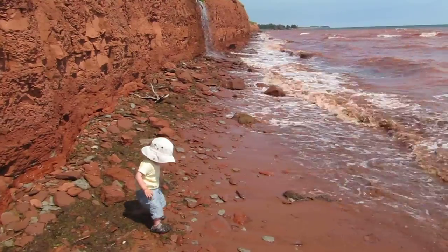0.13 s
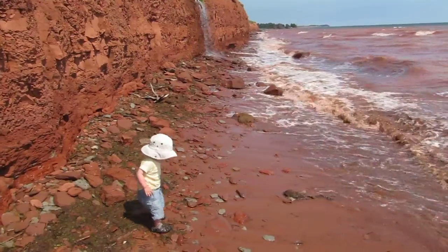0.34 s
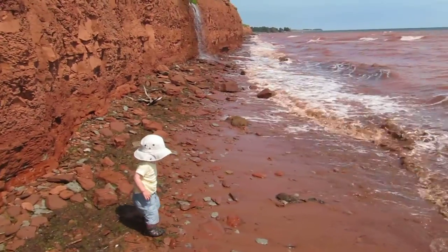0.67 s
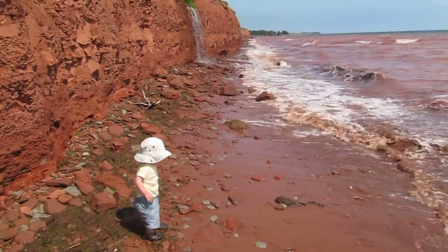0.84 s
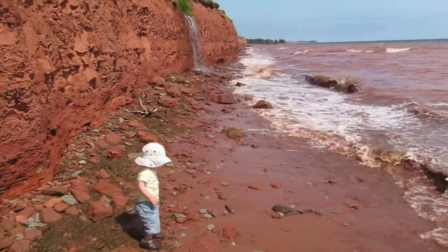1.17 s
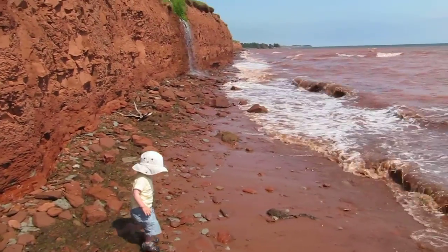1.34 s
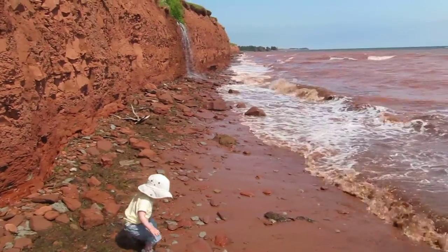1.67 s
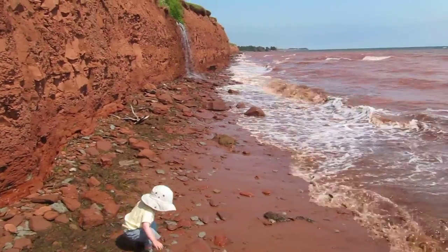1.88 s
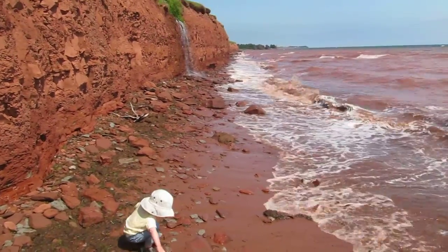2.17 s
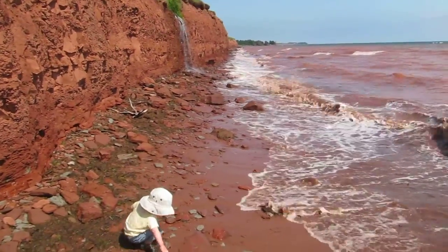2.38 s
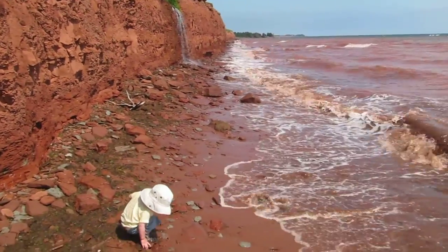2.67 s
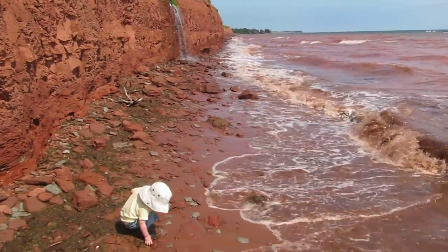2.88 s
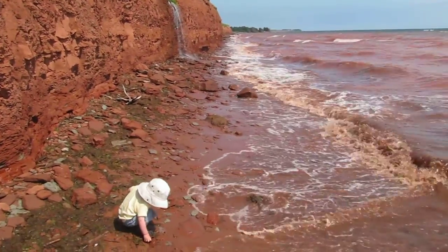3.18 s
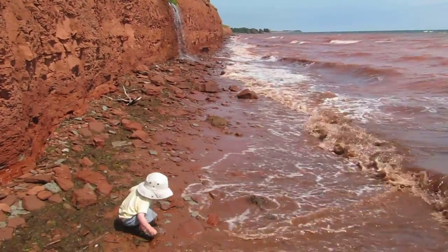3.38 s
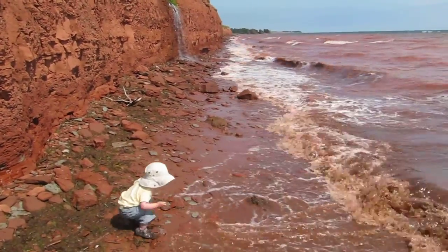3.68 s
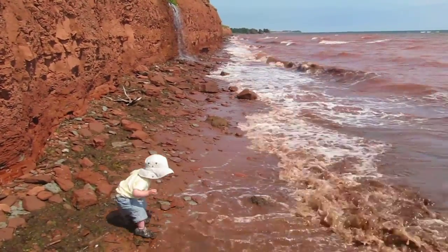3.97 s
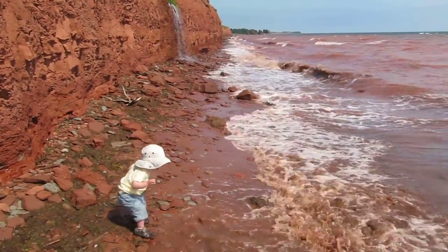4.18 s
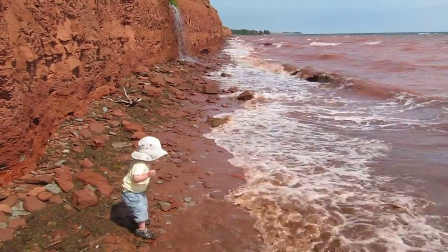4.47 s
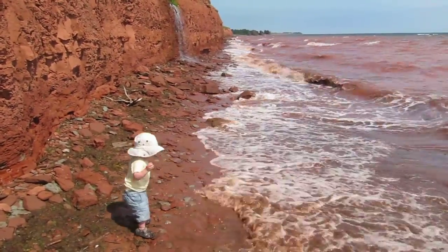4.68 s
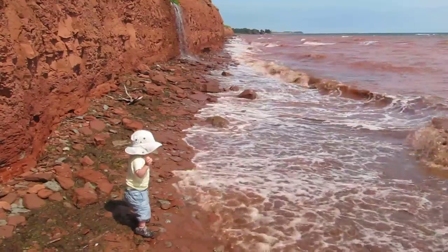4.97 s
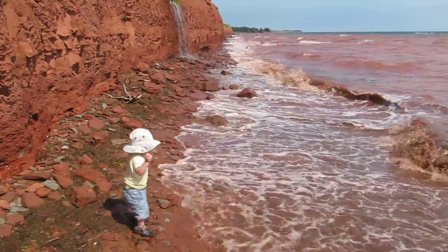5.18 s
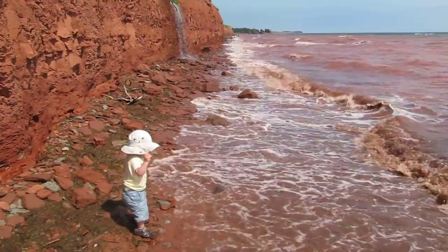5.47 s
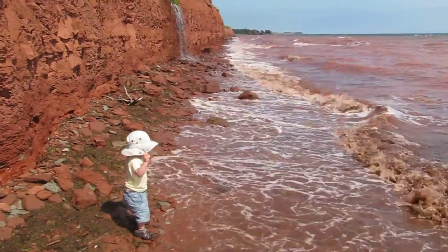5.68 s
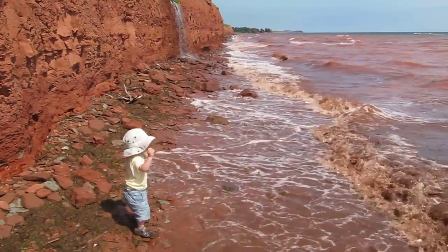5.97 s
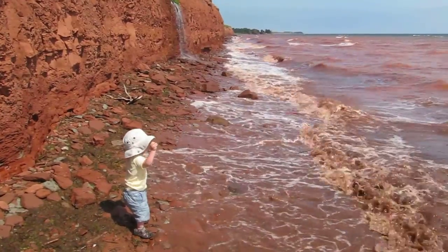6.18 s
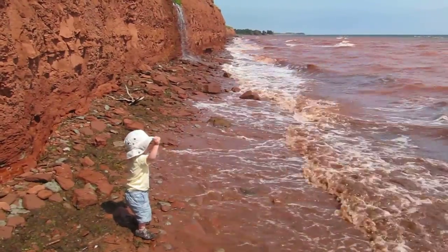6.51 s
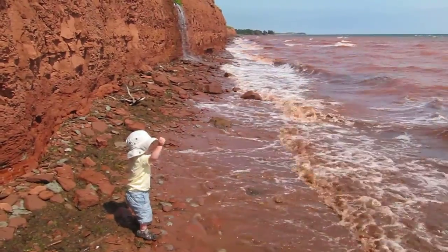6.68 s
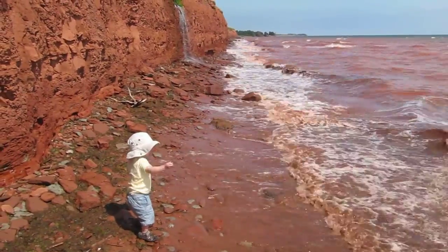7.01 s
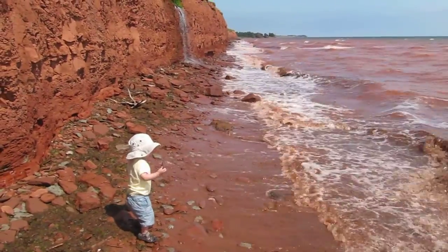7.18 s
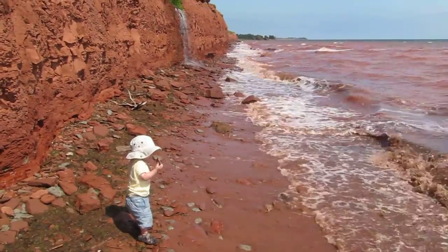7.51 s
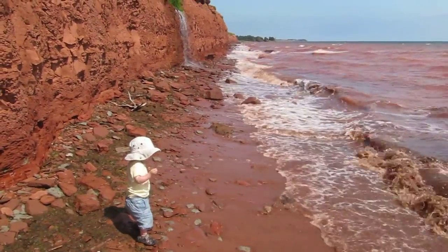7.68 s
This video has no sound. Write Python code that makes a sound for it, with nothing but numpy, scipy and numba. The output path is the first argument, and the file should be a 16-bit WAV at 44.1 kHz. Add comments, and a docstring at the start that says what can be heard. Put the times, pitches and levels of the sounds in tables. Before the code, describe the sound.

Waves break and wash up a stony beach close by, with hissing foam, a low gurgling rumble and hollow slaps of water between stones. Brief patters of spray land nearby. Wind rumbles on the microphone in short swells at first, then in two runs of gusts, mostly on the right. Near the end the hardest gust pops the microphone and everything dips briefly before the surf returns.

```python
"""Waves wash up a stony beach to the right of a small camera with two microphone ports.
From the start foam hisses, breakers rumble and gurgle, and water slaps hollow between stones.
Wind rumbles on each port alone and swells near 1.3 and 2 s, about when the first spray lands.
From 4.4 s a run of gusts strikes mainly the right port, and another from 6.2 s; at 6.7 s the
hardest one snaps its membrane, and the gain control ducks everything, then recovers."""
import sys
import numpy as np
from scipy import signal
from scipy.fft import rfft, irfft, next_fast_len
from scipy.io import wavfile
from scipy.ndimage import uniform_filter1d
from numba import njit

SR = 44100
rng = np.random.default_rng(int(sys.argv[2]) if len(sys.argv) > 2 else 0)


def transcribe(u):
    """Save the signal u as a 16-bit wav file named by the first command-line argument.

    u: samples, shape (n,) or (channels, n), limited to [-1, 1]; the rate is SR.
    q: integer samples, one column per channel.
    """
    v = np.clip(np.atleast_2d(u).T, -1, 1)
    q = np.round(v * 32767).astype(np.int16)
    wavfile.write(sys.argv[1], SR, q)


N = 346185


def undb(db):
    return 10 ** (np.asarray(db) / 20)


def at_rms(x, db):
    return x * undb(db) / np.sqrt(np.mean(x ** 2))


def time_curves(table):
    time_s, *columns = np.transpose(table)
    return [np.interp(np.arange(N) / SR, time_s, column) for column in columns]


def freq_curve(table, hz):
    freq_hz, values = np.transpose(table)
    return np.interp(np.log(hz + 1), np.log(freq_hz), values)


def butter(x, edges_hz, kind="bandpass", order=2):
    return signal.sosfilt(signal.butter(order, edges_hz, kind, fs=SR, output="sos"), x)


def walk(rate_hz):
    """Random steps, smoothed twice; spread near 1."""
    hold = int(SR / rate_hz)
    steps = np.repeat(rng.standard_normal(N // hold + 1), hold)
    return 0.94 * uniform_filter1d(uniform_filter1d(steps, hold), hold)[:N]


def flicker(rate_hz, drift_s=0.19):
    """A walk minus its slow drift."""
    wander = walk(rate_hz)
    return wander - uniform_filter1d(wander, int(drift_s * SR))


# Stronger wind: start_s, port (-1 left, 1 right), hold_s, level_db
WIND_SPELLS = [(1.3, 1, 0.042, -15), (1.48, -1, 0.033, -25), (1.86, 1, 0.037, -24.5), (2.02, -1, 0.11, -16),
               (2.1, 1, 0.036, -22), (3.1, 1, 0.29, -28), (4.38, 1, 0.04, -27), (4.37, -1, .55, -23),
               (4.43, 1, 0.15, -16.5), (4.66, 1, 0.27, -16.5), (5.08, -1, 0.028, -24),
               (5.09, 1, 0.054, -19), (5.43, 1, 0.04, -18.5), (6.28, -1, 0.11, -22),
               (6.16, 1, 0.032, -21.5), (6.3, 1, 0.04, -10.5), (6.55, -1, .2, -21), (6.665, 1, 0.06, -12),
               (6.9, 1, 0.11, -17.5), (6.98, -1, 0.16, -22.5), (7.07, 1, 0.08, -12.5),
               (7.49, 1, 0.094, -16), (7.5, -1, 0.093, -21)]
def wind_db(port, breeze_db=-37, swing_db=4, rise_db_per_s=281, fall_db_per_s=180):
    """A wandering breeze; each spell is full at start_s, holds and dies away."""
    t = np.arange(N) / SR
    db = breeze_db + swing_db * walk(5.13)
    for start_s, side, hold_s, level_db in WIND_SPELLS:
        if side == port:
            before_db = rise_db_per_s * np.maximum(start_s - t, 0)
            after_db = fall_db_per_s * np.maximum(t - start_s - hold_s, 0)
            db = np.maximum(db, level_db - before_db - after_db)
    return db


def wind():
    """Eddies rumble and flutter on each port alone; stronger wind sheds smaller, higher ones too."""
    out = []
    for port in (-1, 1):
        db = wind_db(port) + 2.75 * walk(22)
        large = at_rms(butter(rng.standard_normal(N), [39.3, 137]), 0)
        small = at_rms(butter(rng.standard_normal(N), [114, 345]), 0)
        out.append(undb(db) * (large + small * undb(0.57 * (db + 11) - 3.5)))
    return np.array(out)


# Gusts: centre_s, port (-1 left, 1 right), length_s, level_db, pitch_hz
WIND_GUSTS = [(0.296, 1, 0.017, -12.5, 117), (1.338, 1, 0.04, -16, 160), (1.377, 1, 0.025, -15.5, 70),
              (2.059, -1, 0.035, -9.5, 123), (2.095, 1, 0.025, -13.5, 141), (4.384, 1, 0.018, -8, 110),
              (4.415, 1, 0.03, -13, 220), (4.478, 1, 0.035, -11, 151), (4.505, 1, 0.043, -8.5, 127),
              (4.54, 1, 0.026, -9, 130), (4.572, 1, 0.042, -7.5, 119), (4.676, 1, 0.016, -14, 146),
              (4.701, 1, 0.064, -10.5, 140), (4.786, 1, 0.062, -9, 158), (4.839, 1, 0.025, -13, 89.5),
              (4.88, 1, 0.035, -16, 128), (4.931, 1, 0.052, -16.5, 110), (5.086, -1, 0.023, -19, 94.3),
              (5.095, 1, 0.019, -16, 188), (6.156, 1, 0.015, -19, 170), (6.186, 1, 0.016, -8, 200),
              (6.187, 1, 0.013, -14.5, 430), (6.193, -1, 0.027, -18, 114), (6.253, 1, 0.013, -18, 170),
              (6.291, -1, 0.017, -7.5, 95), (6.297, 1, 0.02, -13.5, 490), (6.304, 1, 0.023, -9, 161),
              (6.322, -1, 0.019, -11, 92), (6.384, 1, 0.013, -13, 209), (6.619, -1, 0.012, -18, 110),
              (6.655, -1, 0.0091, -13, 130), (6.664, 1, 0.016, -5, 190), (6.679, 1, 0.011, 0.5, 292),
              (6.688, 1, 0.0055, -7, 200), (6.703, 1, 0.0082, -2, 192), (6.914, 1, 0.023, -15, 117),
              (7.091, 1, 0.014, -10, 161), (7.147, 1, 0.056, -14.5, 200), (7.167, -1, 0.029, -19, 268),
              (7.308, 1, 0.015, -16, 150), (7.495, 1, 0.01, -10, 170), (7.507, 1, 0.012, -9, 160),
              (7.524, 1, 0.014, -8, 211), (7.545, 1, 0.037, -8, 238)]
def gusts():
    """Each gust is a short lump of low turbulence on one port."""
    half = SR // 5
    t = np.arange(-half, half) / SR
    out = np.zeros((2, N + 2 * half))
    for centre_s, port, length_s, level_db, pitch_hz in WIND_GUSTS:
        envelope = np.exp(-.5 * (t / (0.47 * length_s)) ** 2)
        turbulence = butter(rng.standard_normal(2 * half), [0.658 * pitch_hz, 1.35 * pitch_hz])
        power = uniform_filter1d(turbulence ** 2, int(SR / pitch_hz))
        turbulence /= np.sqrt(power + 1e-9)  # pressure holds through the gust
        lump = envelope * butter(turbulence, 2.8 * pitch_hz, "lowpass")
        lump *= undb(level_db) * np.sqrt(np.sum(envelope ** 2) / np.sum(lump ** 2))
        at = int(centre_s * SR)
        out[int(port > 0), at:at + 2 * half] += lump
    return out[:, half:half + N]


# Membrane snaps: start_s, port (-1 left, 1 right), level_db, pitch_hz
MEMBRANE_SNAPS = [(4.373, 1, -9, 105), (4.473, 1, -2.5, 150), (4.494, 1, -10, 110), (4.668, 1, -7, 140),
                  (6.65, -1, -3, 121), (6.6945, 1, 13, 150), (6.732, 1, -6, 200), (7.081, 1, -5, 130),
                  (7.357, 1, -2.5, 170), (7.492, 1, -7, 170), (7.503, 1, -7, 150)]
def snaps(rise_s=0.00019, t60_s=0.043):
    """Wind snaps a port's membrane: a sudden pressure drop, then a few dying swings."""
    t, out = np.arange(N) / SR, np.zeros((2, N))
    for start_s, port, level_db, pitch_hz in MEMBRANE_SNAPS:
        age_s = np.maximum(t - start_s, 0)
        envelope = undb(level_db - 60 * age_s / t60_s) * (1 - np.exp(-age_s / rise_s))
        out[int(port > 0)] -= envelope * np.cos(2 * np.pi * pitch_hz * age_s)
    return out


# Landing spray: start_s, level_db, length_s
SPRAY_SPLASHES = [(1.756, -27, 0.018), (2.257, -24.5, 0.016), (3.93, -32, .012), (4.0, -27, 0.018),
                  (4.18, -31.5, .015), (4.284, -27, .012), (5.07, -31, .012), (5.16, -37, 0.018),
                  (6.63, -26.5, 0.0142)]
def splashes():
    """Thrown spray lands close by in short patters, louder on the right."""
    t, envelope = np.arange(N) / SR, np.zeros(N)
    for start_s, level_db, length_s in SPRAY_SPLASHES:
        envelope += undb(level_db) * np.exp(-.5 * ((t - start_s - length_s) / (0.61 * length_s)) ** 2)
    patter = at_rms(butter(rng.standard_normal((2, N)), [1500, 5300]), 0)
    return envelope * patter * undb([[-2.5], [1.5]])


# Hollow slaps: start_s, peak_db, pitch_hz, t60_s, glide_share_per_s
WATER_SLAPS = [(0.235, -16, 983, .1, 0.5), (0.25, -17, 760, .12, 0.5), (0.27, -16, 420, .1, 1),
               (0.61, -18, 688, 0.22, -3), (0.626, -12, 364, 0.096, 3.5), (0.629, -18, 1166, .3, -1.5),
               (0.659, -15.5, 452, 0.22, -6), (0.735, -15, 147, 0.22, -2), (0.752, -18, 860, 0.091, -2),
               (0.857, -19, 625, .12, 0), (1.515, -9, 199, 0.11, -3), (1.515, -10.5, 270, 0.091, -0.5),
               (1.754, -21, 3260, 0.04, 0), (1.849, -12.5, 320, 0.21, 1), (1.889, -12.5, 302, 0.16, -0.5),
               (1.948, -24, 2900, .06, 5), (2.595, -20, 735, 0.08, 2), (2.659, -18, 276, 0.1, 3),
               (2.775, -21, 322, 0.1, 0), (2.69, -14.5, 515, 0.097, 1), (2.8, -19, 645, 0.2, 0),
               (2.989, -15, 276, 0.12, 0), (3.02, -19, 472, .12, 1), (3.099, -22, 277, 0.16, 4.5),
               (3.15, -20, 664, 0.11, -3), (3.04, -25, 420, 0.091, 0), (3.125, -16, 313, 0.092, 3),
               (3.29, -15, 300, 0.09, 5), (3.352, -16, 185, 0.18, -3), (4.172, -22, 2650, .06, 2),
               (5.068, -22, 191, 0.14, 2), (7.166, -11.5, 282, 0.1, 1)]
def slaps():
    """Water traps a pocket of air between stones, which rings briefly in both ports."""
    t, out = np.arange(N) / SR, np.zeros(N)
    for start_s, peak_db, pitch_hz, t60_s, glide_per_s in WATER_SLAPS:
        age_s = np.maximum(t - start_s, 0)
        envelope = (1 - np.exp(-age_s / 0.0012)) * undb(-60 * age_s / t60_s)
        tone = np.sin(2 * np.pi * pitch_hz * age_s * (1 + glide_per_s * age_s / 2))
        out += undb(peak_db) * envelope / envelope.max() * tone
    return out * undb([[-1.5], [0]])


@njit
def ring_bubbles(starts, steps_rad, cycles, gains, rise_share):
    """Each bubble is a dying sine whose pitch climbs as it nears the surface."""
    out = np.zeros(N)
    for start, step_rad, gain in zip(starts, steps_rad, gains):
        length = int(cycles * 2 * np.pi / step_rad)
        phase = 0.
        for i in range(min(length, N - start)):
            phase += step_rad * (1 + rise_share * i / length)
            out[start + i] += gain * np.exp(-5. * i / length) * np.sin(phase)
    return out


def bubbles(lo_hz, hi_hz, cycles, spread_db, count):
    """Bubbles at random moments, a few much louder than the rest; unit RMS."""
    when, pitch, strength = rng.random((count, 3)).T
    starts = (when * N).astype(np.int64)
    steps_rad = 2 * np.pi * lo_hz * (hi_hz / lo_hz) ** pitch / SR
    gains = undb(spread_db * np.minimum(-np.log(1 - strength), 4))
    return at_rms(ring_bubbles(starts, steps_rad, cycles, gains, rise_share=0.19), 0)


LEFT_LAG_S = 5.5e-5  # near water reaches the right port first

# Bursting foam bubbles: time_s, above_surf_db
FOAM_POPPING = [(0, -26), (.9, -20), (1.6, -18), (2.2, -16), (2.7, -25), (3.1, -16), (3.7, -16), (4.1, -19),
                (4.6, -19), (5.0, -15.5), (5.25, -13.5), (5.6, -20), (6.2, -18), (6.9, -16), (7.25, -12),
                (7.5, -17), (7.85, -22)]
def near_bubbles(body_db):
    """Large bubbles gurgle with the breakers; small ones pop in the foam."""
    gurgle = bubbles(194, 1360, cycles=10, spread_db=2.8, count=4000) * undb(body_db - 11)
    pops = bubbles(2970, 4240, cycles=7.7, spread_db=5, count=9000) * undb(time_curves(FOAM_POPPING)[0])
    right = gurgle + pops
    left = np.roll(right, round(LEFT_LAG_S * SR)) * undb(-2)
    return np.array([left, right])


# Surf spectrum: freq_hz, density_db
SURF_SPECTRUM = [(18, -27), (85, -9.5), (150, -5), (290, -2), (450, -5.5), (700, -3), (1700, -8),
                 (2600, -11.5), (3300, -11), (3900, -14.5), (4800, -18.5), (6400, -21.5), (7600, -34),
                 (9000, -32), (11200, -27), (15600, -39)]
# Port balance: freq_hz, left_minus_right_db
PORT_BALANCE = [(60, 5), (110, -2), (200, -2), (380, -1.5), (700, -2), (1290, -0.5), (2380, -7.5),
                (4400, -1.5), (8120, -1.5), (15000, 2.5)]
# Sound common to both ports: freq_hz, power_share
PORT_COHERENCE = [(60, 0.99), (200, 0.99), (700, 0.99), (1200, 0.93), (2000, 0.17), (3000, 0.99),
                  (4500, 0.24), (6000, 0.5), (7400, 0.04), (9000, 1), (10500, 0), (14000, 0.1)]
# Left port's phase beyond its lag: freq_hz, phase_rad
LEFT_PHASE = [(7500, 0), (9000, -1.5), (10200, -1.6), (12000, -1.6), (14000, -0.4)]
def surf_spectra(hz, n_fft):
    """Near breakers reach both ports as one noise; far water comes from all sides."""
    coherence = np.clip(freq_curve(PORT_COHERENCE, hz), 0, 1)
    common, left, right = rfft(rng.standard_normal((3, n_fft)))
    left_rad = freq_curve(LEFT_PHASE, hz) - 2 * np.pi * hz * LEFT_LAG_S
    near = np.sqrt(coherence) * common * np.exp(1j * left_rad * [[1], [0]])
    far = np.sqrt(1 - coherence) * np.array([left, right])
    colour_db = freq_curve(SURF_SPECTRUM, hz) + freq_curve(PORT_BALANCE, hz) * [[.5], [-.5]]
    spectra = (near + far) * undb(colour_db)
    return spectra / np.sqrt(2 * np.mean(abs(spectra) ** 2) / n_fft)


# Fizz of foam and pebbles, and finest spray: time_s, fizz_above_foam_db, mist_above_foam_db
FOAM_FIZZ = [(0, 4.5, 5.5), (.4, 3.5, 4.5), (.9, 3, 4.5), (1.3, 5, 5), (1.55, 3, 2.5), (1.85, 5, 4.5),
             (2.2, 4.5, 5.5), (2.5, 5.5, 5.5), (2.9, 4, 4), (3.3, 3, 4), (3.7, 4, 3.5), (4.3, 5, 6),
             (4.8, 3.5, 6), (5.1, 4.5, 5), (5.5, 3, 5), (5.9, 4, 5), (6.3, 5.5, 5), (6.65, 5.5, 8),
             (6.95, 5, 6.5), (7.1, 5, 6), (7.22, 5.5, 7), (7.33, 3, 5), (7.45, 4.5, 7), (7.58, 3.5, 4.5),
             (7.85, 3.5, 6)]
def wash(body_db, roar_db):
    """Countless bursting bubbles blur into noise whose bands swell together and flicker alone."""
    fizz_db, mist_db = time_curves(FOAM_FIZZ)
    n_fft = next_fast_len(N)
    hz = np.arange(n_fft // 2 + 1) * SR / n_fft
    spectra = surf_spectra(hz, n_fft)
    slosh_db, spray_db, froth_db = 0.32 * walk(7.9), 1.1 * flicker(20), 0.37 * flicker(27)
    mist_db += 1.3 * flicker(32)
    out = np.zeros((2, N))
    for octave in np.arange(4, 15, .5):  # log2 of the band centre in Hz
        window = np.cos(np.pi * np.clip(np.log2(hz + 1) - octave, -.5, .5)) ** 2
        roar_share = np.clip((9.25 - octave) / 0.86, 0, 1)
        body_share = np.clip((11 - octave) / 1.0, 0, 1)
        fizz_share = np.clip((octave - 11.5) / 0.97, 0, 1)
        mist_share = np.clip(octave - 12.5, 0, 1)
        db = roar_share * roar_db + 0.78 * flicker(11)
        db += body_share * (body_db + slosh_db) + (1 - body_share) * spray_db
        db += fizz_share * (mist_share * mist_db + (1 - mist_share) * fizz_db + froth_db)
        out += undb(db) * irfft(spectra * window, n_fft)[:, :N]
    return out


# Breaking waves: time_s, surf_db, body_above_foam_db, roar_above_body_db
SURF_LEVELS = [(0, -18, 2, 3), (.27, -16.5, 3.5, -1), (.47, -16.5, 0.5, 1.5), (.65, -17, 1.5, 2),
               (1.1, -16.5, 2.5, -1.5), (1.7, -15.5, 0.5, -0.5), (2.1, -17, 0.5, 3.5), (2.25, -22, 1, 2),
               (2.43, -20.5, -1.5, 1), (2.58, -16, 2, -6), (2.7, -16.5, 2, 1), (2.82, -15.5, 0, 2),
               (2.93, -16, 1, 4), (3.08, -15, -1.5, 6), (3.25, -16, 1, 2), (3.7, -15.5, -2, 0.5),
               (4.3, -17.5, 0.5, 4), (4.45, -17.5, 0.5, 4.5), (4.64, -11.5, 0, -1), (4.8, -17, 0.5, 3.5),
               (4.93, -16.5, 0.5, -1), (5.05, -17, 1.5, 0), (5.2, -16, -1.5, 6.5), (5.36, -17, 1, 1),
               (5.6, -18, 0, 1.5), (6.0, -16.5, -2, 1), (6.3, -21.5, 0.5, 4.5), (6.6, -19.5, -1, -4),
               (6.7, -20, 2.5, -2), (6.8, -18.5, -0.5, 4), (6.9, -20, 2, 6), (7.05, -21, 2, 2.5),
               (7.18, -18.5, -2, 5), (7.3, -17.5, -3.5, 1.5), (7.42, -21, 0.5, 5.5), (7.55, -16.5, 0.5, 2),
               (7.7, -21, 2, 4), (7.85, -20.5, -3.5, 5.5)]
def surf():
    """Waves break and run up the stones; wash and bubbles rise and fall together."""
    surf_db, body_db, roar_db = time_curves(SURF_LEVELS)
    return (wash(body_db, roar_db) + near_bubbles(body_db)) * undb(surf_db)


def scene():
    return surf() + slaps() + splashes() + wind() + gusts() + snaps()


@njit
def gain_loss_db(excess_db, attack_s, hold_s, release_db_per_s):
    """Gain control: the loss jumps to the excess, holds, then falls steadily; the amplifier lags."""
    out = np.empty(len(excess_db))
    target_db, loss_db, wait = 0., 0., 0.
    for i in range(len(excess_db)):
        if excess_db[i] >= target_db:
            target_db, wait = excess_db[i], hold_s * SR
        elif wait > 0:
            wait -= 1
        else:
            target_db -= release_db_per_s / SR
        loss_db += (target_db - loss_db) / (attack_s * SR)
        out[i] = loss_db
    return out


def record(dry, threshold_db=-12, slope=1.08, cutoff_hz=15300):
    """The port cavity cancels one treble band; one gain control rides both channels on the louder port."""
    heard = butter(dry, 25, "highpass", order=1)
    heard = butter(heard, [7850, 8600], "bandstop", order=3)
    span = int(.04 * SR)
    power = signal.lfilter(np.ones(span) / span, 1, heard ** 2)
    louder_db = 10 * np.log10(power.max(axis=0) + 1e-9)
    excess_db = slope * np.maximum(louder_db - threshold_db, 0)
    loss_db = gain_loss_db(excess_db, attack_s=0.0015, hold_s=0.054, release_db_per_s=28.)
    heard = np.clip(heard * undb(-loss_db), -1, 1)
    return signal.sosfilt(signal.ellip(10, .2, 80, cutoff_hz, fs=SR, output="sos"), heard)


dry = scene()
out = record(dry)
transcribe(out)
```